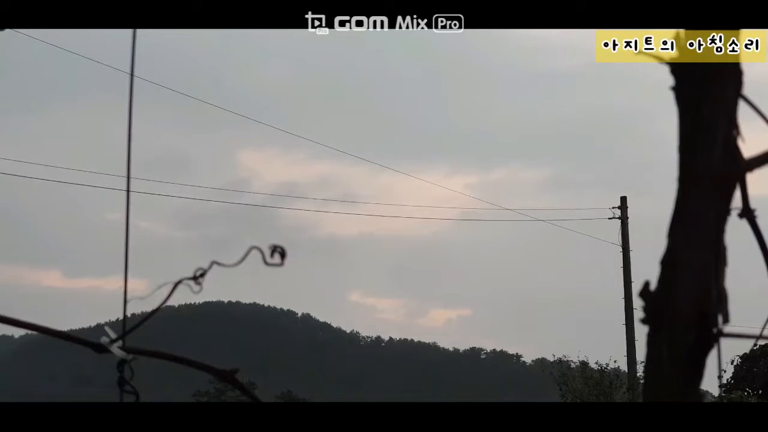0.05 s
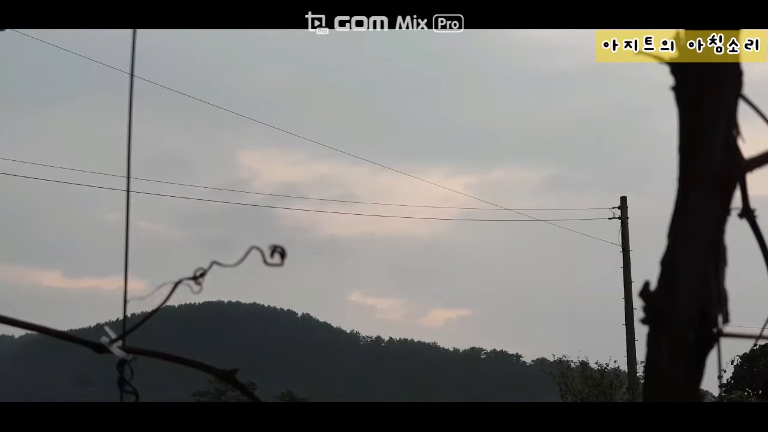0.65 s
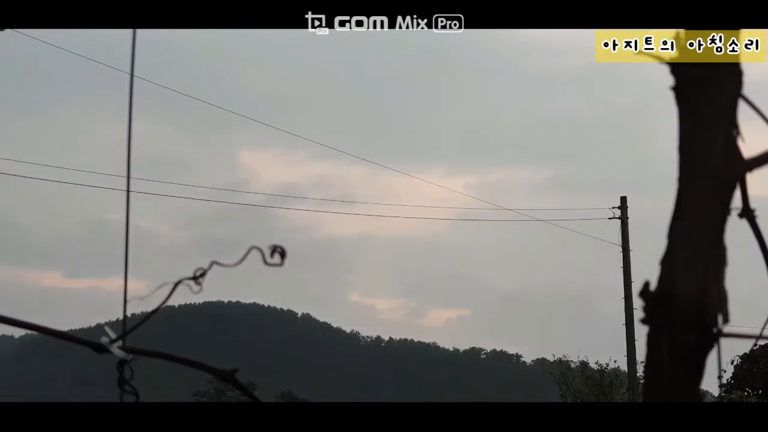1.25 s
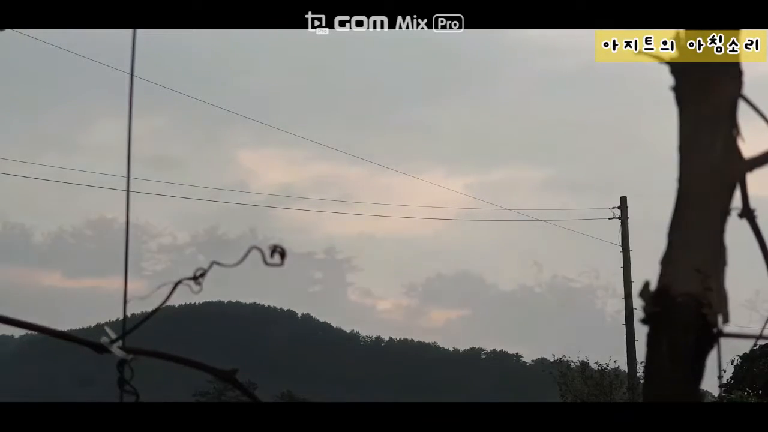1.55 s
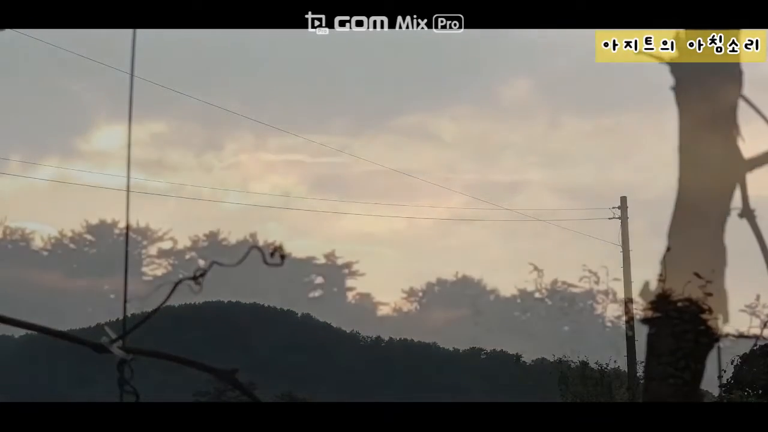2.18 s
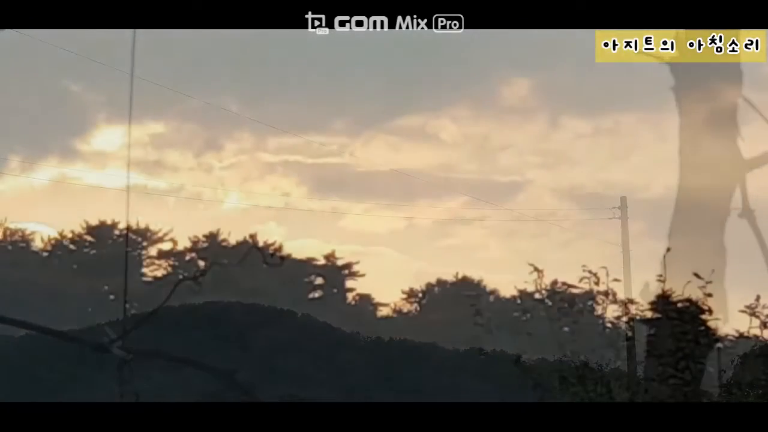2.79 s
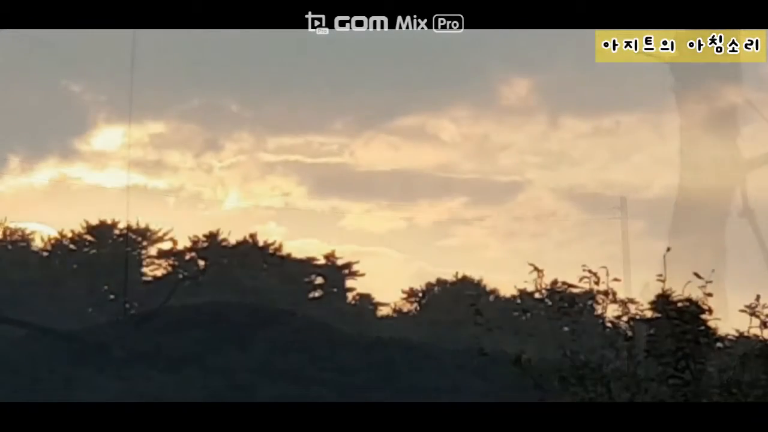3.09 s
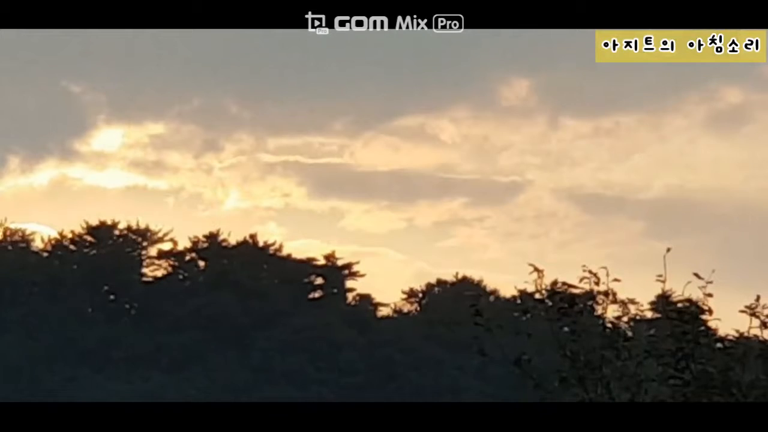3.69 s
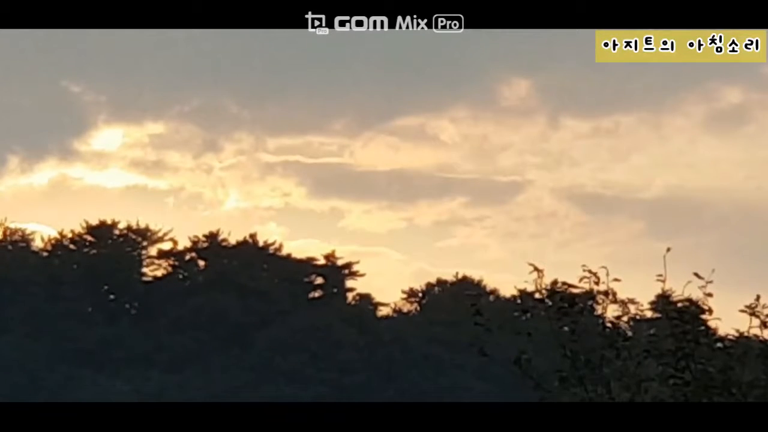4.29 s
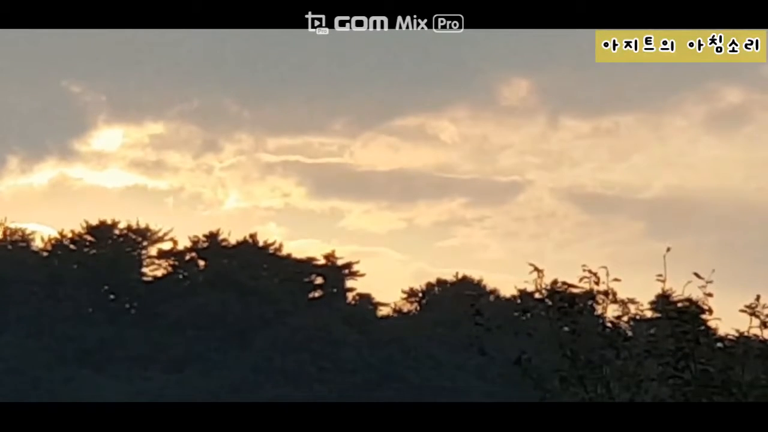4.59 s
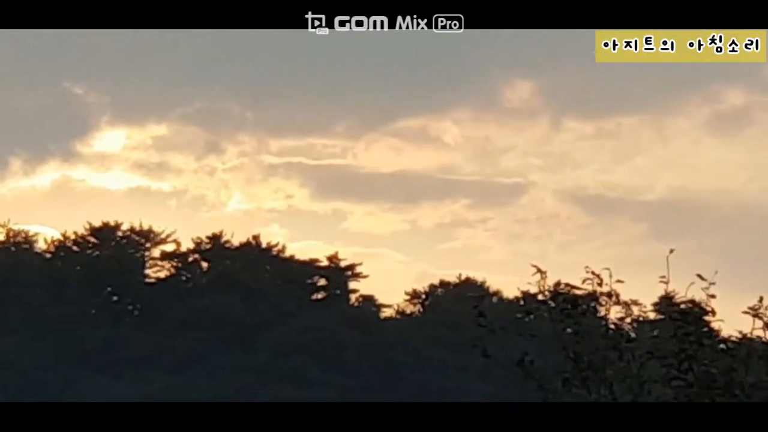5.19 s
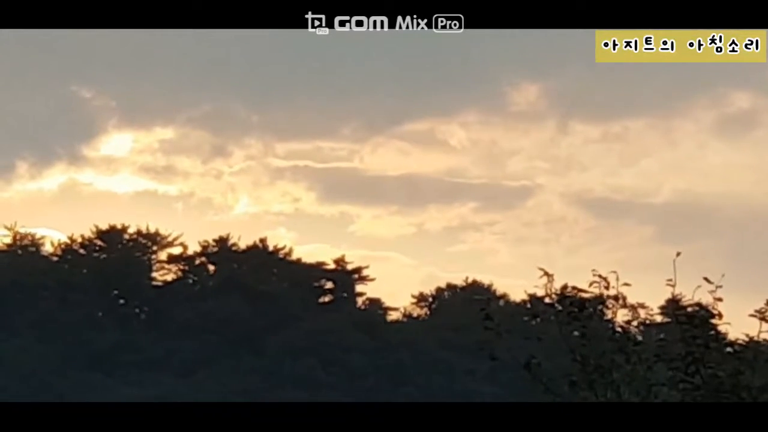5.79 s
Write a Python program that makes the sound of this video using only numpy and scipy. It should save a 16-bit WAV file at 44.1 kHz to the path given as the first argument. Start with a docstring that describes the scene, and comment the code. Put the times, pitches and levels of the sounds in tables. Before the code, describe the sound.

Crickets chirp and insects buzz in dawn countryside while a songbird calls harshly, a far rooster crows once and a dog barks, echoing.

```python
"""Open countryside at dawn, two microphones among wooded hills. A distant rooster crows, hoarse and then
clear, and a dog barks, mostly in pairs; the hills echo both. Two field crickets chirp and a katydid rasps
five times a second, all by scraping their wings, under a high drone of insects. A songbird gives harsh,
mostly falling calls, thickest late on. A faint sinking tone hangs like a late echo of the crow; later
comes one distant drawn-out cry. A low far rumble lies under it all."""
import sys
import numpy as np
from scipy import signal
from scipy.fft import rfft, irfft, next_fast_len
from scipy.io import wavfile
from scipy.ndimage import uniform_filter1d, map_coordinates

SR = 44100
rng = np.random.default_rng(int(sys.argv[2]) if len(sys.argv) > 2 else 0)


def generate_wav(sig):
    """Save sig (samples, or channels by samples) to the path in sys.argv[1] as 16-bit PCM at SR."""
    pcm = np.round(np.clip(np.atleast_2d(sig).T, -1, 1) * 32767).astype(np.int16)
    wavfile.write(sys.argv[1], SR, pcm)


N = 266805


def amp(db):
    """Decibels to gain."""
    return 10 ** (np.asarray(db) / 20)


def unit(x):
    """Scale to rms 1."""
    return x / np.sqrt(np.mean(x ** 2) + 1e-20)


def steady(x):
    """Even out the slow swells of a sound, keeping its grain."""
    return x / np.sqrt(np.abs(uniform_filter1d(x ** 2, size=900)) + 1e-9)


def clock():
    """The time of every sample in seconds."""
    return np.arange(N) / SR


def along(points, hz):
    """Read between (Hz, value) points on a log frequency axis."""
    freqs, values = np.transpose(points)
    return np.interp(np.log(hz + 1), np.log(freqs + 1), values)


def curves(rows):
    """One value per sample for each column after the time."""
    times, *columns = np.transpose(rows)
    return [np.interp(clock(), times, column) for column in columns]


def gate(start, end, fade):
    """One between two times, fading to silence outside."""
    return np.interp(clock(), [start - fade, start, end, end + fade], [0, 1, 1, 0])


def beats(runs):
    """The time and level of every beat in evenly paced runs."""
    return [(s + k * period, db) for s, count, period, db in runs for k in range(round(count))]


def wobble(rate):
    """A smooth random curve, rate knots a second."""
    t = clock()
    coarse = t[::6]
    knots = rng.standard_normal(int(N * rate / SR) + 4)
    return np.interp(t, coarse, map_coordinates(knots, [coarse * rate]))


def phase_of(hz):
    """Running phase of a moving frequency."""
    return 2 * np.pi * np.cumsum(hz) / SR


def sweep(length, start_hz, end_hz, bend=1):
    """The swell and phase of one gliding note; a bend above 1 makes the glide speed up."""
    progress = np.linspace(0, 1, max(int(length * SR), 8))
    return np.sin(np.pi * progress), phase_of(start_hz + (end_hz - start_hz) * progress ** bend)


def hoarse(phase, width_hz):
    """Noise reaching about width_hz to either side of a moving frequency."""
    return wobble(2 * width_hz) * np.cos(phase) + wobble(2 * width_hz) * np.sin(phase)


def filtered(x, response):
    """Pass x through a response given as a function of frequency."""
    size = next_fast_len(N + SR // 4, True)
    return irfft(rfft(x, size) * response(np.fft.rfftfreq(size, 1 / SR)), size)[..., :N]


def band(points):
    """Noise of rms 1 with this (Hz, dB) spectrum, unrelated at the two microphones."""
    closed = [(points[0][0] * .8, -120), *points, (points[-1][0] * 1.2, -120)]
    return unit(filtered(rng.standard_normal((2, N)), lambda hz: amp(along(closed, hz))))


def add(track, centre, sound):
    """Mix a short sound into a track, centred on a time."""
    at = round(centre * SR) - len(sound) // 2 + np.arange(len(sound))
    inside = (at >= 0) & (at < N)
    track[at[inside]] += sound[inside]


# The wooded hills all round. Each row: frequency in Hz, seconds for their echo to fall 60 dB.
HILL_DECAY = [(300, 0.4), (550, 0.52), (1050, 0.66), (1800, 0.74), (4000, 0.73), (9000, 0.025)]

def outdoors(x, lead_ms, pan_db, trees_db, hills_db, trees_t60=0.49):
    """Direct sound, scatter from near trees and echo from the hills; positive lead and pan lie left."""
    sides = np.array([[.5], [-.5]])
    direct = filtered(x, lambda hz: np.exp(2j * np.pi * hz * sides * lead_ms / 1000))
    hz, t, noise = signal.stft(rng.standard_normal((2, 2, SR * 3 // 4)), SR, nperseg=256)
    trees = signal.istft(noise[0] * amp(-60 * t / trees_t60), SR, nperseg=256)[1]
    hills = signal.istft(noise[1] * amp(-60 * t / along(HILL_DECAY, hz)[:, None]), SR, nperseg=256)[1]
    tail = amp(trees_db) * trees / np.linalg.norm(trees[0])
    tail += amp(hills_db) * hills / np.linalg.norm(hills[0])
    return amp(sides * pan_db) * (direct + signal.fftconvolve(x[None], tail, axes=1)[:, :N])


def slope_echo(x, delay_s=.405, echo_db=-23, dull_hz=1300):
    """A sound followed by its one distinct, dull return from a far slope."""
    echo = filtered(x, lambda hz: np.exp(-2j * np.pi * hz * delay_s) / (1 + (hz / dull_hz) ** 2))
    return x + amp(echo_db) * echo * (clock() > delay_s)


# The far rumble and the hiss behind everything. Each row: frequency in Hz, relative level in dB.
RUMBLE_BAND = [(18, -36), (30, -14), (42, -5), (75, -1), (110, -6), (155, -12), (250, -10.5), (400, -14.5),
               (700, -21.5), (1200, -26), (2600, -24.5)]
HISS_BAND = [(1500, -40), (2600, 6.5), (7000, -9.5), (8600, -52), (9400, -24.5), (10400, 2), (11200, 3.5),
             (15500, 3)]
# The rumble across the microphone pair. Each row: frequency in Hz, left-right likeness from 0 to 1.
RUMBLE_LIKENESS = [(40, 0.96), (150, 0.69), (400, 0.4), (900, 0.049), (3000, 0.13)]

def air(rumble_db=-45, hiss_db=-54):
    """Far rumble, its lows alike at both microphones, and a faint even hiss."""
    def mid_and_side(hz):
        angle = np.arccos(np.clip(along(RUMBLE_LIKENESS, hz), -1, 1)) / 2
        return np.array([np.cos(angle), np.sin(angle)])

    mid, side = filtered(band(RUMBLE_BAND), mid_and_side)
    rumble = amp(rumble_db + 2.53 * wobble(10)) * unit(np.array([mid + side, mid - side]))
    return rumble + amp(hiss_db) * band(HISS_BAND)


# Insects out in the field. Each row: time in seconds, relative levels of buzz and trill in dB.
DRONE_LEVELS = [(0.0, -45, -46), (0.64, -42, -44), (1.03, -41.5, -44.5), (2.73, -43.5, -45),
                (2.98, -45, -47.5), (3.76, -43.5, -43), (4.78, -44, -48), (5.39, -46.5, -41.5),
                (6.05, -48, -45)]
# High buzz, middle trill and far chorus. Each row: frequency in Hz, relative level in dB.
BUZZ_BAND = [(6000, -43), (6700, -36), (7250, 2.5), (7650, -0.5), (7950, -7.5), (8300, -23), (8800, -43.5),
             (9300, -80)]
TRILL_BAND = [(4700, -57), (5250, 3.5), (5680, 10.5), (5980, -1), (6200, 8), (6500, -4.5), (7000, 7.5),
              (7800, -32)]
CHORUS_BAND = [(2700, -3), (3300, 5.5), (3650, -4), (3950, 13), (4090, 5.5), (4250, 14.5), (4730, 11.5),
               (5200, 12.5), (6000, -27)]

def insect_drone(stroke_hz=85.5, chorus_db=-40.5):
    """A bush cricket's pulsing buzz, off to the left, over the blended trills of many far insects."""
    buzz_db, trill_db = curves(DRONE_LEVELS)
    pulse_depth = np.interp(clock(), [2, 3], [.42, .17])
    strokes = 1 + pulse_depth * np.sin(phase_of(stroke_hz * (1 + 0.0417 * wobble(2.6))))
    buzz = amp(buzz_db + 2) * unit(band(BUZZ_BAND) * strokes) * amp([[2.6], [-2.6]])
    trill = amp(trill_db + 4.5 + wobble(13)) * band(TRILL_BAND) * amp([[1.2], [-1.2]])
    chorus = amp(chorus_db + wobble(3.27) + wobble(40)) * band(CHORUS_BAND)
    return buzz + trill + chorus


# One faint insect, very high in pitch. Each row: frequency in Hz, relative level in dB.
THIN_TRILL_BAND = [(10300, -26), (11000, -15), (11400, -17), (12200, -27)]

def insect_tick(tick_db=-52, trill_db=-59):
    """A falling tick that trails off as a thin trill."""
    shape, phase = sweep(length=0.06, start_hz=11700, end_hz=11230)
    tick = np.zeros(N)
    add(tick, 3.59, amp(tick_db) * shape * np.sin(phase + wobble(400)[:len(phase)]))
    return tick + amp(trill_db) * gate(3.61, 3.9, .04) * band(THIN_TRILL_BAND)


# A rustle at both microphones. Each row: frequency in Hz, relative level in dB.
RUSTLE_BAND = [(120, -7), (500, 1), (1400, -10), (3000, -21), (8000, -21), (13000, -15)]

def rustle(level_db=-44):
    """One brief puff of broad noise as the songbird calls."""
    return amp(level_db) * gate(5.065, 5.085, 0.0086) * band(RUSTLE_BAND)


def bird_calls(calls, scatter, flutter_rate, gain_db=11, overtone_db=-33):
    """Gliding whistles, torn into a screech by fast irregular pitch flutter."""
    track, flutter = np.zeros(N), np.tanh(wobble(flutter_rate))
    for s, length, start_hz, end_hz, db, harsh in calls:
        shape, phase = sweep(length, start_hz, end_hz)
        flutter_hz = scatter * harsh * start_hz * np.roll(flutter, -round(s * SR))[:len(phase)]
        phase = phase + phase_of(flutter_hz)
        whistle = np.sin(phase) + amp(overtone_db) * np.sin(2 * phase)
        add(track, s, amp(db + gain_db) * shape * whistle)
    return track


# Two tones from a long way off. Each row: centre and length in seconds, start and end pitch in Hz,
# relative level in dB, harshness from 0 to 1.
FAR_TONES = [(2.33, 0.59, 664, 599, -68, .1), (4.74, 0.31, 1344, 1280, -55, 0.81)]

def far_tones():
    """A faint sinking tone like a late echo of the crow; later, one distant drawn-out cry."""
    return bird_calls(FAR_TONES, scatter=0.101, flutter_rate=850)


# A songbird a little to the left. Each row: centre and length in seconds, start and end pitch in Hz,
# relative level in dB, harshness from 0 to 1.
SONGBIRD_CALLS = [(.43, 0.18, 2480, 2530, -53.5, 0.52), (.445, 0.086, 2144, 2170, -52, 0.27),
                  (.6, 0.044, 5310, 4900, -40.5, 0.3), (.79, 0.066, 2480, 2343, -42.5, 0.5),
                  (.85, 0.11, 2220, 2090, -46, 0.44), (.965, 0.06, 4280, 3640, -35.5, 0.77),
                  (1.2, 0.085, 2630, 2500, -46.5, 0.57), (1.75, 0.097, 2475, 2694, -41.5, 0.99),
                  (2.745, 0.086, 2420, 2710, -53, 1), (3.185, 0.032, 5110, 5750, -40, 0.6),
                  (3.985, .06, 4546, 3935, -45, 0.51), (4.16, 0.11, 3600, 2870, -49.5, 0.82),
                  (4.225, 0.089, 3820, 3940, -43, 0.42), (4.472, 0.045, 4000, 4160, -33.5, 0.24),
                  (4.51, 0.06, 4200, 3390, -34, 0.12), (4.93, 0.054, 3250, 3020, -57, 0.6),
                  (5.087, 0.037, 4200, 3570, -30.5, 0.2), (5.118, 0.05, 3760, 3390, -42, 0.17),
                  (5.24, 0.13, 2516, 2760, -54.5, 0.74), (5.277, 0.024, 4170, 3940, -36, 0.27),
                  (5.482, 0.036, 4020, 3640, -39.5, .25), (5.625, 0.09, 4460, 3570, -44, 0.37),
                  (5.77, .04, 4200, 3760, -38, 0.22)]
# The rasp on its sharp calls. Each row: centre and length in seconds, relative level in dB.
CHIPS = [(0.99, 0.076, -36), (4.479, 0.076, -25), (4.535, 0.05, -32), (5.078, 0.086, -27.5),
         (5.267, 0.066, -26.5), (5.477, 0.11, -29.5), (5.621, 0.12, -27.5)]
# The colour of that rasp. Each row: frequency in Hz, relative level in dB.
CHIP_BAND = [(3000, -10.5), (3500, -0.5), (4100, -3), (4900, 3.5), (5600, -6), (7500, -9), (8800, -22),
             (9600, -56)]

def songbird(sharpness=3, grain_db=3):
    """Harsh whistles, the sharp ones edged with a peaked, grainy burst of high noise."""
    whistles = bird_calls(SONGBIRD_CALLS, scatter=0.127, flutter_rate=720)
    swell = np.zeros(N)
    for s, length, db in CHIPS:
        offset = np.linspace(-1, 1, int(length * SR))
        add(swell, s, amp(db) * (1 - offset ** 2) / (1 + sharpness * offset ** 2))
    return whistles + swell * unit(band(CHIP_BAND)[0] * amp(grain_db * wobble(330)))


# A katydid, dry and wide across the microphones. Each row: first rasp in seconds, number of rasps,
# period in seconds, relative level in dB.
RASP_RUNS = [(.475, 2, 0.092, -45), (.95, 8, .1865, -38), (2.445, 6, .197, -38), (3.75, 4, 0.176, -43),
             (4.5, 9, .19, -38.5)]
# The scrape of its file. Each row: frequency in Hz, relative level in dB.
RASP_BAND = [(3400, -4.5), (4100, 0), (4450, 2.5), (4730, 8.5), (5000, -2), (5350, -2.5), (6200, -62)]

def katydid(length=0.16, wing_hz=4730, width_hz=170, drift=.045, ring_db=-4, gain_db=4):
    """Dry swelling rasps, no two alike: a grain of file teeth rings the wing's wandering resonance."""
    swell = np.zeros(N)
    for s, db in beats(RASP_RUNS):
        loud, stretch = rng.normal(0, [1, .12])
        shape = signal.windows.tukey(int(length * (1 + stretch) * SR), .85)
        add(swell, s, amp(db + gain_db + loud) * shape)
    wing = phase_of(wing_hz * (1 + drift * wobble(18)))
    ring = unit(np.array([hoarse(wing, width_hz), hoarse(wing, width_hz)]))
    return swell * unit((band(RASP_BAND) + amp(ring_db) * ring) * amp(1.2 * wobble(180)))


# A field cricket almost straight ahead. Each row: first stroke in seconds, number of strokes,
# period in seconds, relative level in dB.
STROKE_RUNS = [(2.54, 12, .084, -38), (3.617, 6, 0.053, -41), (4.055, 3, 0.055, -42),
               (4.33, 2, 0.056, -43.5), (4.62, 2, 0.16, -45)]

def slow_cricket(gain_db=5):
    """Long single wing strokes, each sinking unevenly as the wing slows."""
    track, waver = np.zeros(N), 1.05 * wobble(220)
    for s, db in beats(STROKE_RUNS):
        late, stretch, detune, loud = rng.normal(0, [.002, .12, .012, 1])
        shape, phase = sweep(length=0.05 * (1 + stretch), start_hz=3840, end_hz=3285, bend=1.555)
        drift = waver[round(s * SR):][:len(phase)]
        add(track, s + late, amp(db + loud + gain_db) * shape * np.sin(phase * (1 + detune) + drift))
    return track


# A field cricket near the microphones. Each row: first stroke in seconds, number of strokes,
# relative level in dB.
CHIRPS = [(0.196, 7, -31), (.556, 7, -29.5), (0.912, 7, -29), (1.282, 6, -29), (1.66, 6, -28.5),
          (2.152, 6, -30.5), (2.557, 6, -30), (2.955, 6, -30), (3.335, 6, -29)]

def near_cricket(period_s=.0244, first_db=-16, swell_strokes=0.78, gain_db=3.5):
    """Each wing stroke is a quick falling tone, no two alike; the first strokes of a chirp are weak."""
    track = np.zeros(N)
    slip = 0.77 * wobble(300)  # the scraper slips unevenly over the file
    for start, strokes, db in CHIRPS:
        for k in range(round(strokes)):
            s = start + k * period_s
            late, stretch, detune, loud = rng.normal(0, [.0008, .09, .014, 1.3])
            shape, phase = sweep(length=0.02 * (1 + stretch), start_hz=3700, end_hz=2985, bend=1.45)
            level = db + gain_db + first_db * np.exp(-k / swell_strokes) + loud
            drift = slip[round(s * SR):][:len(phase)]
            add(track, s + late, amp(level) * shape ** 0.65 * np.sin(phase * (1 + detune) + drift))
    return track


BARK_RELEASE_S = 0.026  # the throat closes

def bark_voice(barks, scoop=.24, sag=.13, wander=0.01417, jaw_scoop=.17):
    """Pitch, roughness and resonances of the bark under way: pitch rises over the attack, then sags."""
    rows = np.array(barks)
    current = np.maximum(np.searchsorted(rows[:, 0], clock()) - 1, 0)
    start, length, attack, pitch, rough, chest, throat, mouth = rows[current, :8].T
    age = np.clip(clock() - start, 0, length + BARK_RELEASE_S)
    closed = np.maximum(1 - age / attack, 0) ** 1.5
    ending = np.maximum((age - attack) / (length + BARK_RELEASE_S - attack), 0) ** 2
    arch = 1 - scoop * closed - sag * ending + wander * wobble(60)
    jaw = 1 - jaw_scoop * closed
    return pitch * arch, rough, chest, throat * jaw, mouth * jaw


def bark_swell(barks, levels, rise_db, fade_db_per_s, lag=0):
    """Each bark moves by rise_db to its level, fades and is cut off; lag is a share of the attack."""
    track, age = np.zeros(N), np.arange(SR // 2) / SR
    for (start, length, attack, *_), db in zip(barks, levels):
        onset_db = rise_db * np.maximum(1 - age / (attack * (1 + lag)), 0) ** 1.72
        fade_db = fade_db_per_s * np.maximum(age - attack, 0)
        corners = [lag * attack, (lag + 0.5) * attack, length, length + BARK_RELEASE_S]
        held = np.interp(age, corners, [0, 1, 1, 0])
        add(track, start + age.mean(), held * amp(db - onset_db - fade_db))
    return track


# A dog off to the left. Each row: start, length and attack in seconds, pitch in Hz, roughness from 0
# to 1, chest, throat and mouth resonances in Hz, relative chest, throat, mouth and snarl levels in dB.
BARKS = [(0.922, 0.16, 0.093, 669.4, 0.43, 652.5, 994.4, 1775, -21.5, -30, -31, -36.5),
         (1.21, 0.14, 0.054, 381.7, 0.44, 620, 830, 1600, -24.5, -23.5, -23, -35),
         (1.337, 0.08, 0.06, 613.2, 0.03, 605, 1130, 1842, -15, -25.5, -20, -34),
         (1.599, 0.13, 0.064, 567.5, 0.31, 572, 991, 1720, -28, -26.5, -31.5, -33.5),
         (1.859, 0.105, 0.0584, 566, 0.31, 562.8, 984, 1724, -30.5, -29.5, -32.5, -31.5),
         (3.374, 0.14, 0.1, 530.6, 0.3, 514.4, 1009, 1500, -24, -29.5, -36.5, -47),
         (3.779, 0.0748, 0.055, 534.8, 0.35, 548.3, 899, 1539, -20, -26.5, -25.5, -34.5),
         (3.858, .058, 0.0282, 526.5, 0.52, 540.6, 931, 1398, -22.5, -26.5, -22.5, -30.5),
         (5.305, 0.14, 0.1, 567, 0.22, 550.7, 1050, 1694, -29.5, -29.5, -33.5, -44.5),
         (5.713, 0.16, 0.13, 383.6, 0.45, 689.3, 890, 1665, -48, -32.5, -22, -35.5)]

def dog(jitter=0.01797, shimmer=0.4, doubling=1.56, snarl_hz=2463, gain_db=-2):
    """Jittery vocal harmonics and rasping air in four resonances; the middle two rise as the jaw opens."""
    pitch, rough, chest_hz, throat_hz, mouth_hz = bark_voice(BARKS)
    phase = phase_of(pitch * (1 + jitter * wobble(300)))
    partials = []
    for k in [1, 1.5, 2, 2.5, 3, 3.5, 4, 5, 6]:
        weight = doubling * rough if k % 1 else 1  # a rough voice beats unevenly, adding halfway tones
        partials.append((k * pitch, np.sin(k * phase) * (1 + shimmer * wobble(160)) * weight))

    def resonance(centre_hz, width_hz, airy):
        """The partials that pass one resonance, with a share of air that grows with roughness."""
        voiced = sum(wave / (1 + ((hz - centre_hz) / width_hz) ** 4) for hz, wave in partials)
        breath = hoarse(phase_of(centre_hz * np.ones(N)), width_hz)
        share = np.clip(airy * rough, 0, 1)
        return np.sqrt(1 - share) * steady(voiced) + np.sqrt(share) * breath

    *_, chest_db, throat_db, mouth_db, snarl_db = np.transpose(BARKS)
    chest = bark_swell(BARKS, chest_db, rise_db=15, fade_db_per_s=182)
    throat = bark_swell(BARKS, throat_db, rise_db=-2, fade_db_per_s=20)
    mouth = bark_swell(BARKS, mouth_db, rise_db=27.5, fade_db_per_s=38, lag=0.15)  # the mouth opens late
    snarl = bark_swell(BARKS, snarl_db, rise_db=27.5, fade_db_per_s=38, lag=0.15)
    return amp(gain_db) * (chest * resonance(chest_hz, width_hz=94, airy=1)
                           + throat * resonance(throat_hz, width_hz=170, airy=1.9)
                           + mouth * resonance(mouth_hz, width_hz=350, airy=1.2)
                           + snarl * resonance(snarl_hz, width_hz=330, airy=3))


# A distant rooster, left of centre. Each row: time in seconds, pitch in Hz.
CROW_PITCH = [(0.17, 696), (0.198, 733), (0.268, 742), (0.305, 663), (0.345, 625), (0.385, 691),
              (0.598, 694.7), (0.704, 730), (0.79, 693.7), (0.85, 667.6), (0.905, 692.5), (1.22, 676)]
# Its first four harmonics, each a relative level in dB.
CROW_HARMONICS = [-6.5, 1, -28.5, -22.5]
# Its notes. Each row: start and end in seconds, level in dB, warble depth as a share of pitch,
# hoarseness from 0 to 1.
CROW_NOTES = [(0.212, 0.283, -26, 0.012, 0.37), (0.379, 0.653, -29, 0.037, 0.36),
              (0.691, 0.769, -29.5, 0.008, 0.29), (0.82, 1.353, -33.5, .001, 0.1)]

def rooster(warble_hz=35, jitter=0.023, rasp_width_hz=130, fade_s=0.042, sink_at_s=1.2):
    """A crow of four notes: short and hoarse, warbling, short again, then a long clear sinking hold."""
    sink_hz = 1300 * np.clip(clock() - sink_at_s, 0, .2) ** 2  # out of air, the pitch falls ever faster
    pitch = curves(CROW_PITCH)[0] - sink_hz
    notes = np.array([gate(start, end, fade_s) for start, end, *_ in CROW_NOTES])
    *_, note_db, depth, hoarseness = np.transpose(CROW_NOTES)
    rasp = hoarseness @ notes
    warble = (1 + .15 * wobble(20)) * np.sin(phase_of(warble_hz * (1 + .06 * wobble(16))))
    phase = phase_of(pitch * (1 + depth @ notes * warble + jitter * rasp * wobble(250)))
    voice = np.zeros(N)
    for k, db in enumerate(CROW_HARMONICS, 1):
        level = amp(db + 1.8 * wobble(21.3))
        voice += level * (np.sin(k * phase) + rasp * hoarse(k * phase, rasp_width_hz) / 2 ** .5)
    return unit(voice) * (amp(note_db) @ notes)


def scene():
    """Every animal at its own bearing and distance from the microphone pair."""
    crow = outdoors(rooster(), lead_ms=.06, pan_db=3, trees_db=-11, hills_db=-18)
    barks = outdoors(slope_echo(dog()), lead_ms=.48, pan_db=1.5,
                     trees_db=-3, hills_db=-8.5, trees_t60=0.094)
    chirps = outdoors(near_cricket(), lead_ms=-.35, pan_db=0,
                      trees_db=-4.5, hills_db=-17.5, trees_t60=0.15)
    strokes = outdoors(slow_cricket(), lead_ms=-.24, pan_db=0.5, trees_db=-4.5, hills_db=-11)
    song = outdoors(songbird(), lead_ms=.075, pan_db=1.8, trees_db=-9, hills_db=-9, trees_t60=0.051)
    far = outdoors(far_tones(), lead_ms=0.12, pan_db=2.5, trees_db=-5, hills_db=-28)
    insects = chirps + strokes + katydid() + insect_drone() + insect_tick()
    return crow + barks + song + far + insects + rustle() + air()


def record(dry, top_hz=15800):
    """The recorder keeps nothing above its band limit."""
    return filtered(dry, lambda hz: hz < top_hz)


dry = scene()
out = record(dry)
generate_wav(out)
```